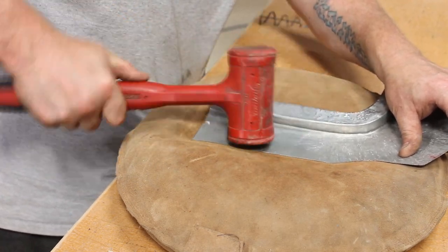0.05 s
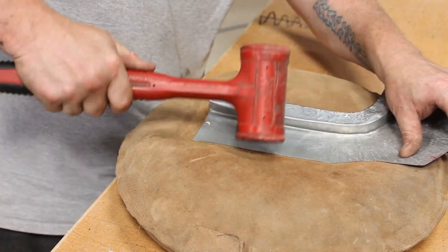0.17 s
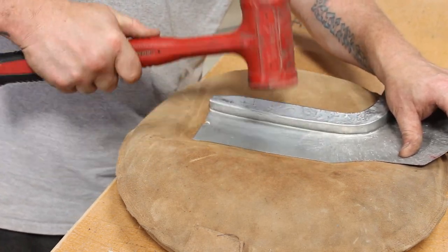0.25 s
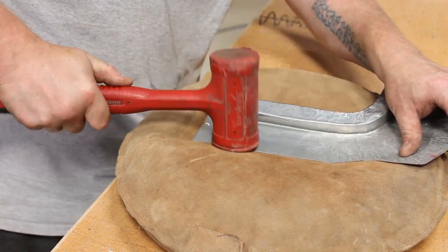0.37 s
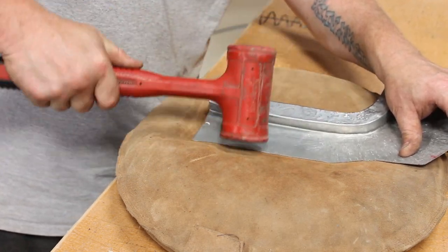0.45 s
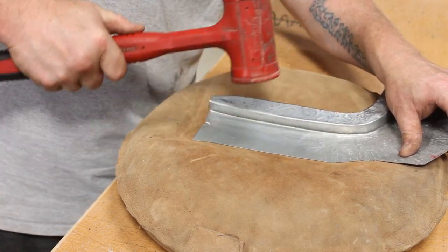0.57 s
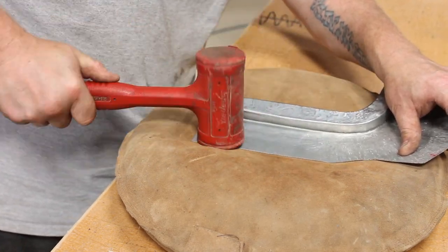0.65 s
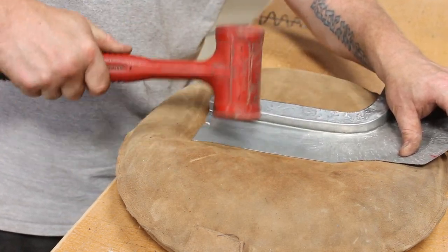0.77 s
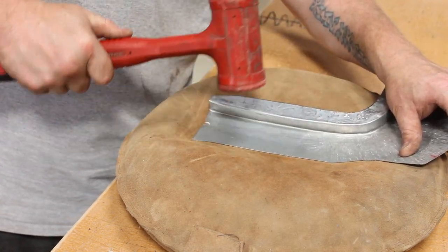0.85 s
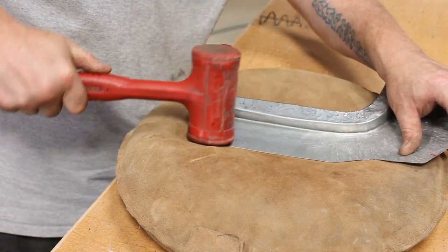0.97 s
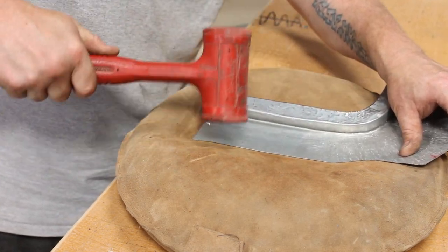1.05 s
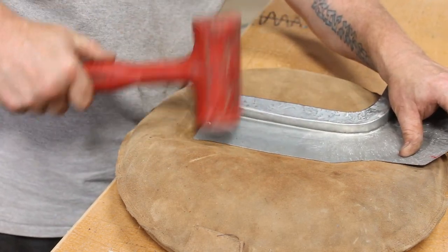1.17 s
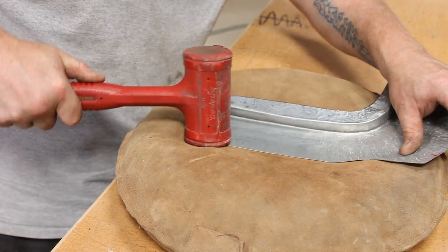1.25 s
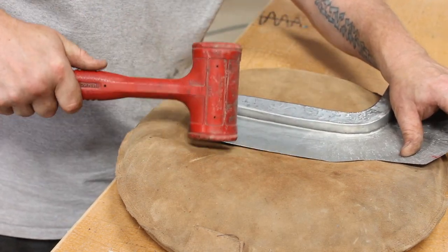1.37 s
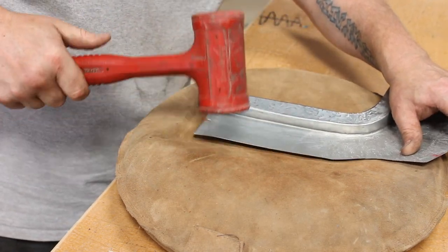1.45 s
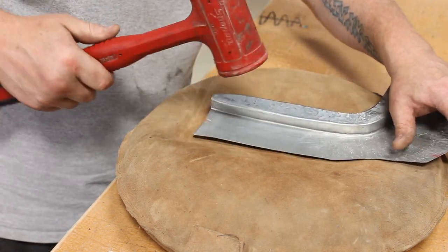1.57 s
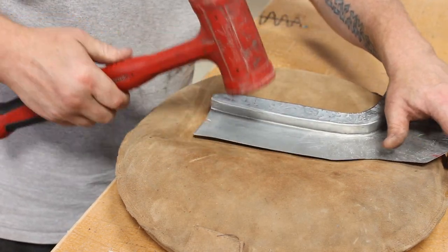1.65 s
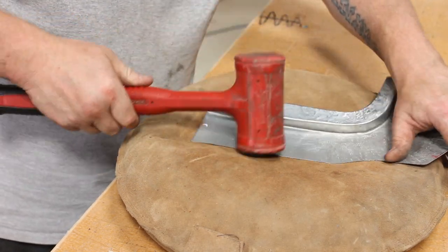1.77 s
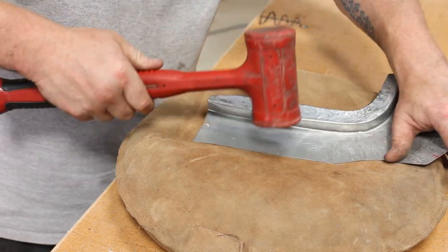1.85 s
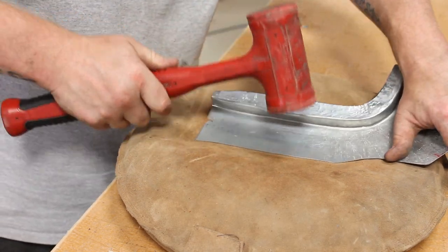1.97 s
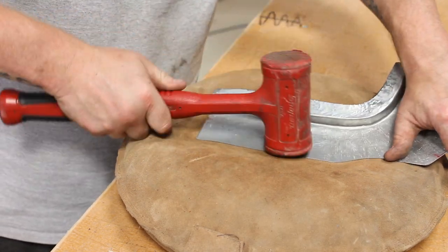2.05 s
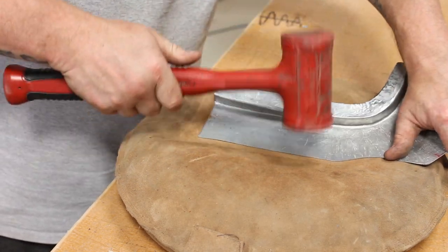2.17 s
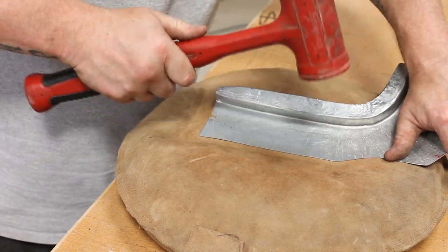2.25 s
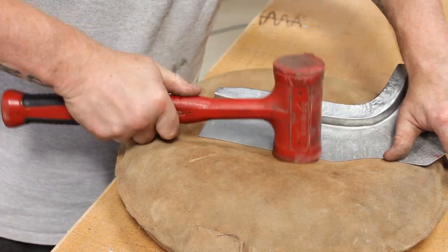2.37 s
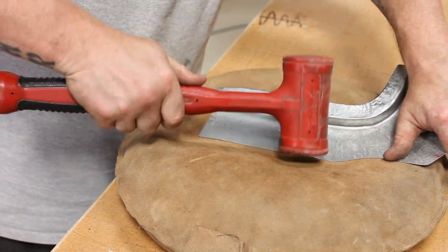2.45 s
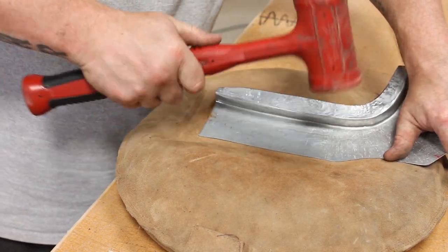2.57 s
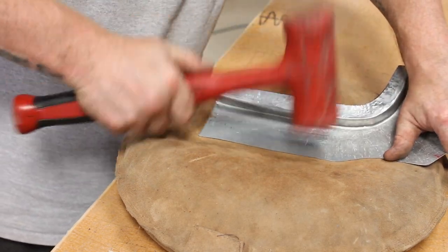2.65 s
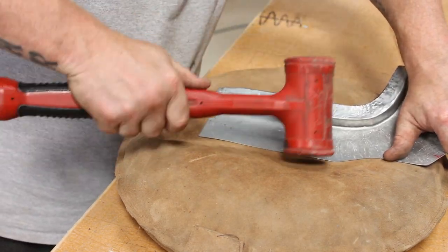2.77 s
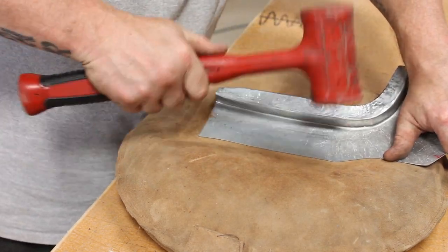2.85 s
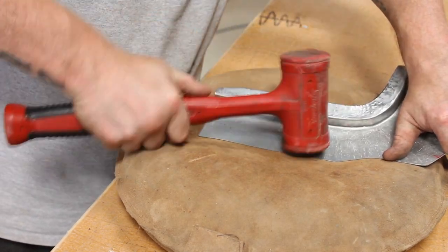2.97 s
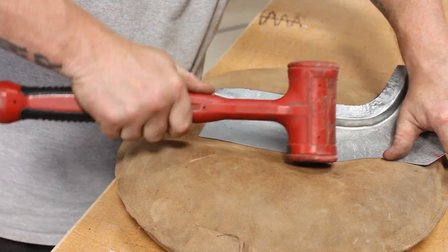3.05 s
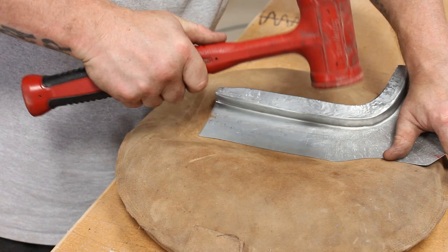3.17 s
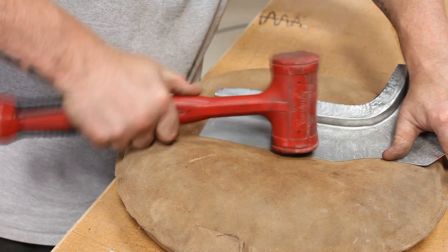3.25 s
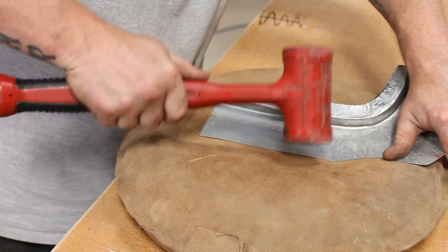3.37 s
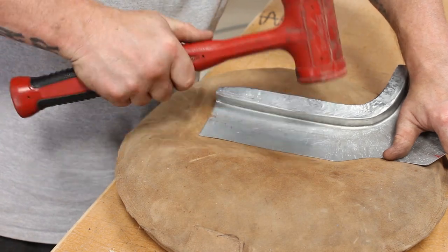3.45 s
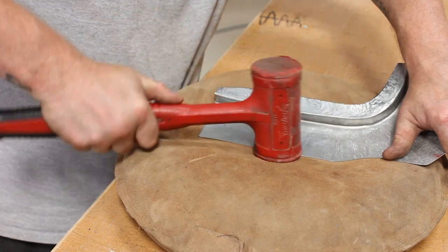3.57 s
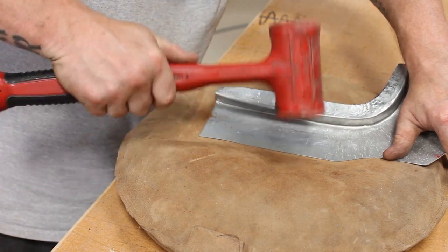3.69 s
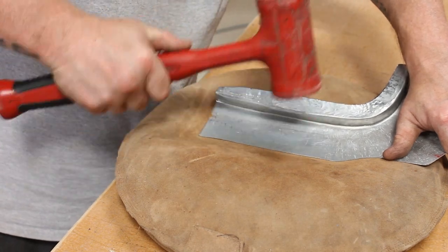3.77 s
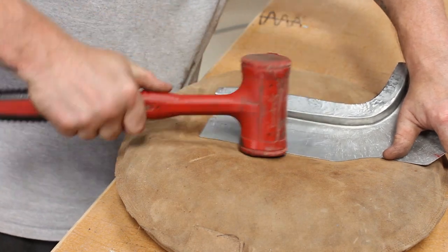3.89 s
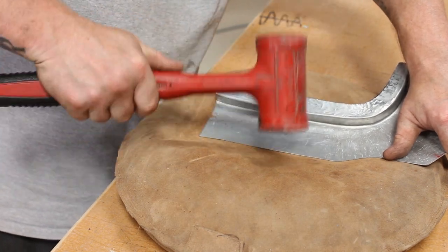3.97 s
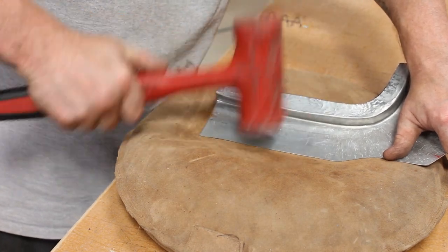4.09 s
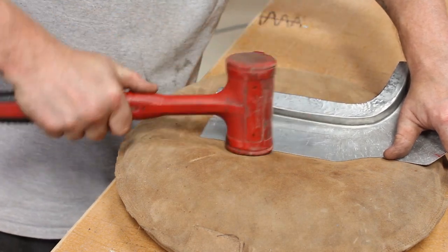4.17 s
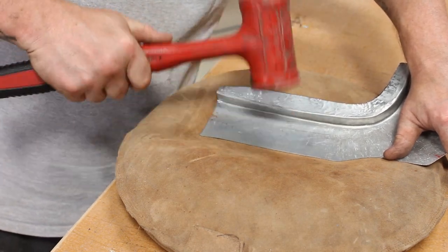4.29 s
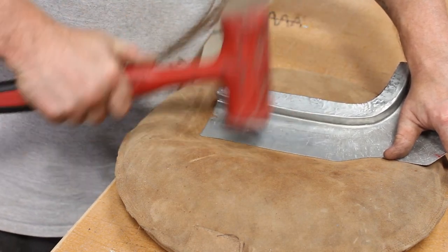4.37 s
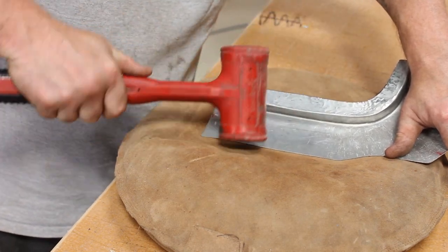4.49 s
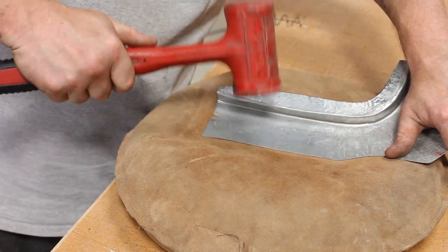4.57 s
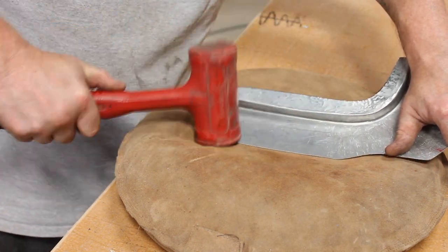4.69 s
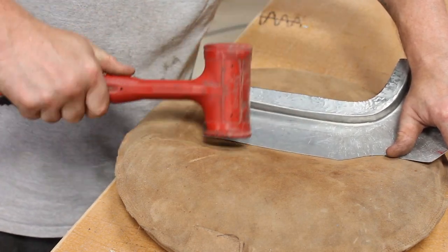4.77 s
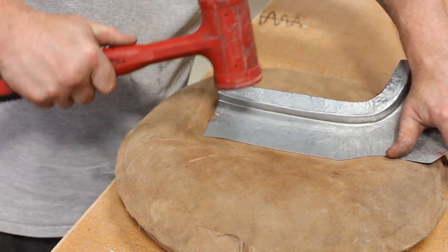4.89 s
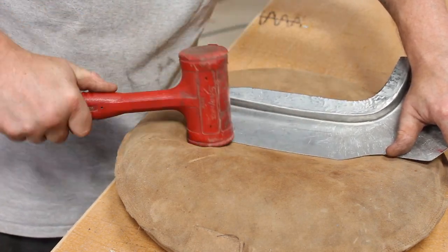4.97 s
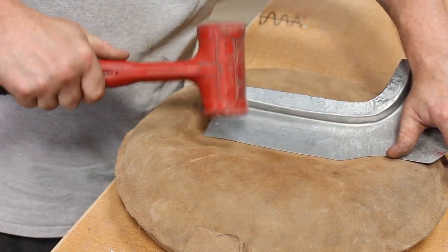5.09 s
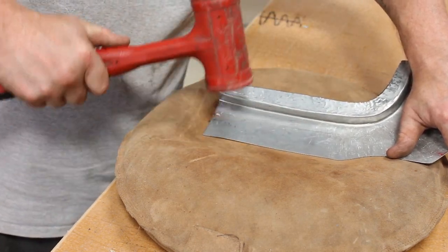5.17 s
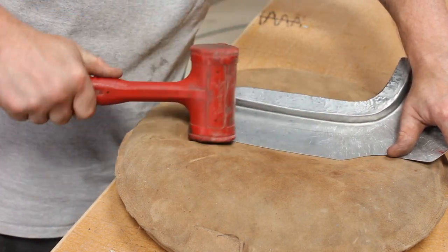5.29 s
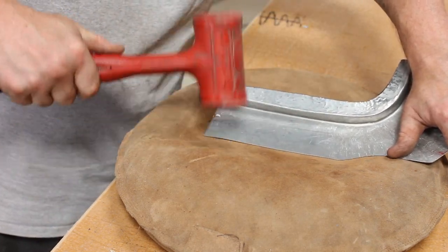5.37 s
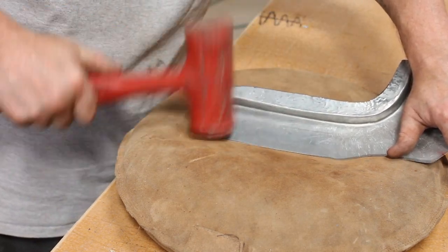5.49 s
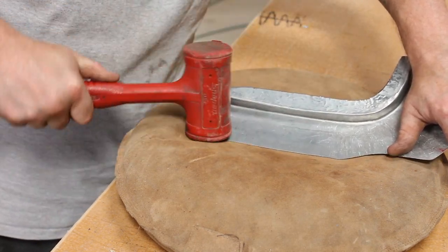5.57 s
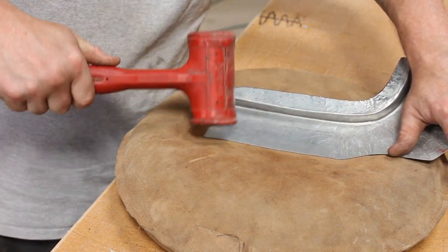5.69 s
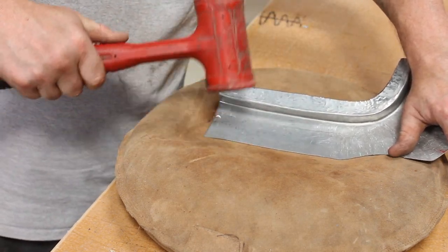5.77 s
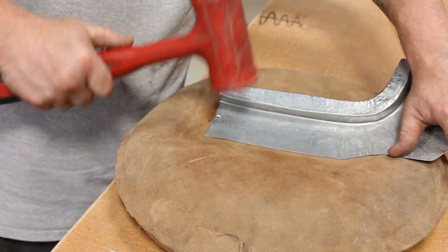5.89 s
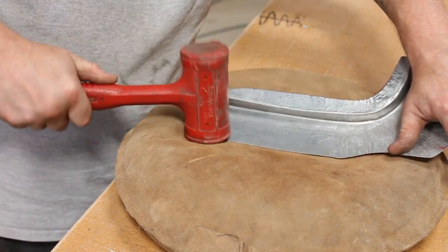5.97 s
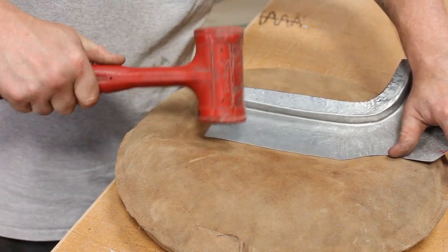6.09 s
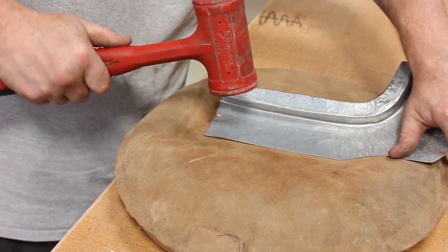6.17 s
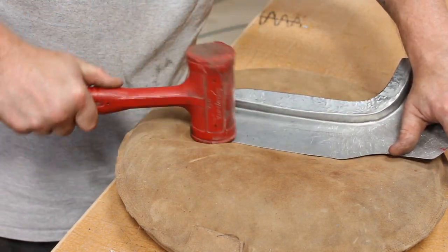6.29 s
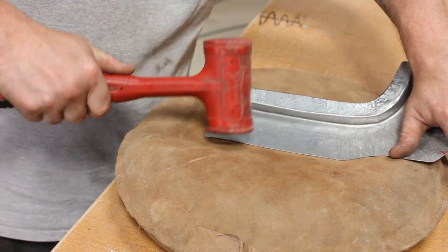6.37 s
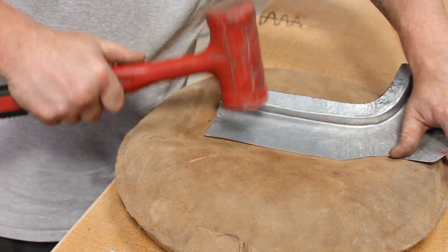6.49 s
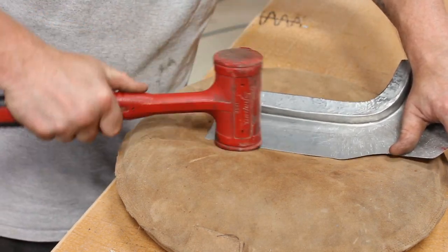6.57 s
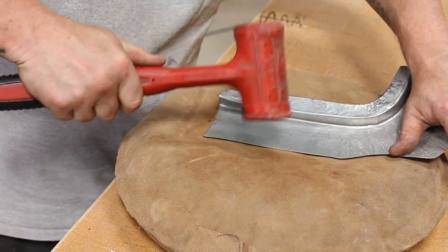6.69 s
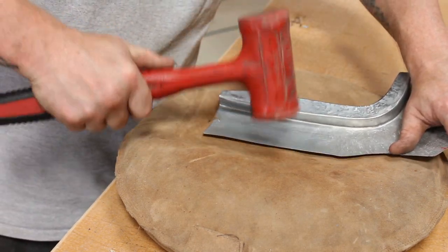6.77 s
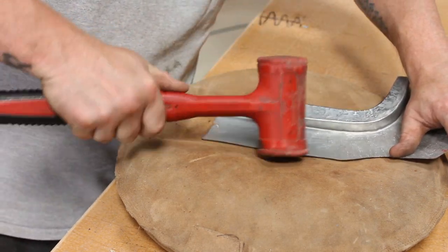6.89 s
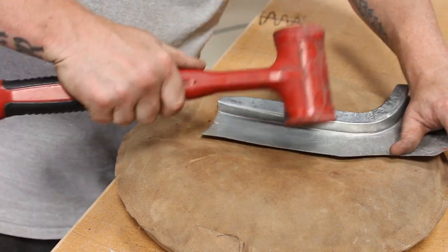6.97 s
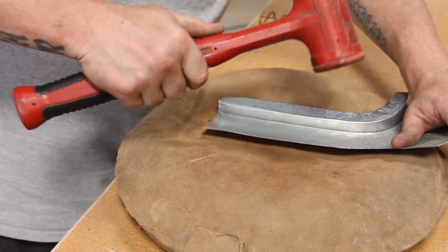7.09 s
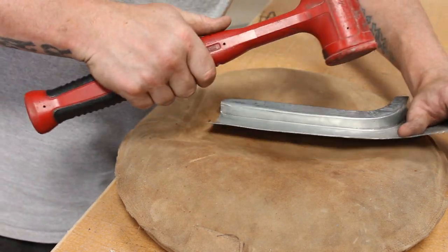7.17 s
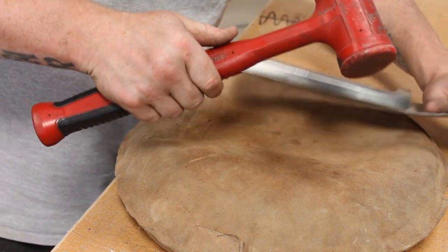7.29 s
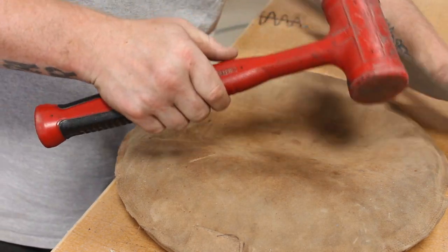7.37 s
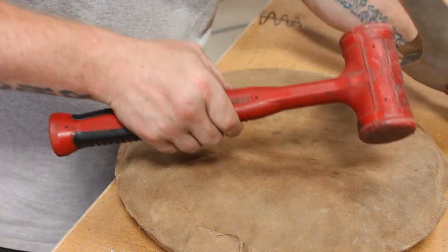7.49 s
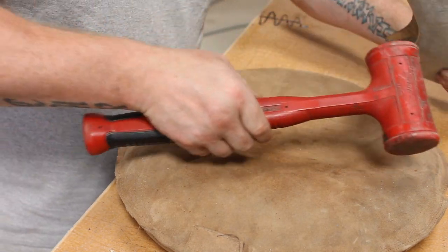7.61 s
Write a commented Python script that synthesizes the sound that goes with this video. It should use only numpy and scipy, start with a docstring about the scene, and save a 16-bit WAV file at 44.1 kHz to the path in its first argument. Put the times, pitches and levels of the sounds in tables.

```python
"""A dead-blow mallet beats a sheet-metal panel on a leather sandbag: shaped noise bursts excite a resonant spot.
Damped modes of the panel and bench, and a gliding sine for the bag, follow the force of each blow.
Decaying noise answers as the hall of a live workshop for about a second; the panel scuffs, ticks and sings faintly.
Air noise and a low hum lie beneath, and the near microphone overloads on the strongest peaks."""
import sys
import numpy as np
from scipy import signal
from scipy.fft import rfft, irfft
from scipy.io import wavfile
from scipy.ndimage import uniform_filter1d

SR = 44100
rng = np.random.default_rng(int(sys.argv[2]) if len(sys.argv) > 2 else 0)


def wrap_up_sound(samples):
    """Save the sound to the file named by the first command line argument, as 16-bit audio."""
    columns = np.atleast_2d(samples).T
    # keep every value between -1 and 1, then stretch to whole-number steps
    tamed = np.clip(columns, -1, 1)
    steps = np.round(tamed * 32767).astype(np.int16)
    wavfile.write(sys.argv[1], SR, steps)


N = 336923  # length [samples]
LEAD = SR // 2  # working time before zero [samples], so that an earlier blow can ring into the start
EDGE_HZ = 15900  # upper band limit of the microphone signal

# Force laws: value at a force of 0 dB, change per dB of force
CLANG_DB, CLANG_PER_DB = -4, 1.1146  # the middle of the crack grows fastest
SNAP_DB, SNAP_PER_DB = -1, 0.9467  # its treble grows a little slower than the force
RING_DB, RING_PER_DB = -7, 0.92  # the free modes of the panel
BAG_HZ, BAG_HZ_PER_DB = 107, 1  # pitch before its glide: packed harder, the sand is stiffer
# The slap fades with time constant SLAP_S [s] for a snap above PINNED_DB, and CHATTER_S [s] below LOOSE_DB
SLAP_S, CHATTER_S, PINNED_DB, LOOSE_DB = .0022, .0032, -9, -15

# Mallet blows: (time [s], force [dB], extra clang of a flat landing [dB], extra snap of an edge [dB],
# extra thump when the sand gives [dB], note of the struck spot [Hz], strength of that note [dB])
MALLET_BLOWS = [(-0.13, -2.5, 1.5, -2, -0.5, 780, -12), (0.1564, -3.5, 3, 2, -1, 1230, -6),
                (0.4469, -2.5, 2, -1.5, 1, 820, -3), (0.7328, -4.5, -1, 0, -1, 892, 4.5),
                (1.008, -8, -2, 0.5, 0, 757, 4.5), (1.2956, -6.5, -3, 0, 1, 2680, -3),
                (1.86, -18.5, 2, -1.5, 18.5, 2410, 8), (2.1364, -8.5, -3, -1, 0.5, 2240, 10),
                (2.4598, 3, -2, -1, 2, 1154, -0.5), (2.7804, .5, 0.5, 2.5, 4.5, 1300, -3.5),
                (3.073, -1, 2.5, -1, 4.5, 1300, -6), (3.3586, -2, 1.5, 1.5, 0.5, 1600, -4.5),
                (3.64, -1.5, 0.5, -.5, -2.5, 1370, -0.5), (3.9248, -4, 2, 2, -1, 1524, 0.5),
                (4.214, -4.5, 3, 2.5, 0.5, 1740, -5), (4.4956, -7.5, 4.5, 2.5, 4.5, 1710, -8),
                (4.7751, -7.5, -1, -1.5, 2, 1880, -6), (5.048, -8, -2.5, -2, 0.5, 3300, -2),
                (5.3212, -9, 0, -1, 1.5, 2040, -3), (5.6072, -5, -3, 0.5, -6, 820, -4.5),
                (6.0417, -6.5, -1.5, 1, -4, 2950, -10), (6.3469, -8.5, -1.5, -0.5, 4.5, 4370, -1),
                (6.6306, -6.5, -1, 1.5, 4, 890, 2), (6.911, -13, -1, 8, 9.5, 3600, 2)]


def mallet(alike=0.591, spot_db=3, spot_room_db=-4, panel_room_db=-27, radiating_hz=1500):
    """Impact excitation: one force drives the room, the direct cracks and the ringing bodies."""
    slaps, cracks, body = np.zeros((3, N + LEAD))
    usual = rng.standard_normal(1024)  # the part of the grain that all blows share
    # a narrow strip sends little bass into the room
    far_field = signal.butter(1, radiating_hz, "high", fs=SR)
    for s, force, flat, edge, give, spot_hz, spot in MALLET_BLOWS:
        own = rng.standard_normal(1024)
        grain = np.sqrt(alike) * usual + np.sqrt(1 - alike) * own
        hit = contact(grain, force, flat, edge)
        note = gain_of(spot) * spot_note(hit, spot_hz)
        panel = panel_ring(force)

        add(slaps, s, hit + gain_of(spot_room_db) * note)
        add(slaps, s, gain_of(panel_room_db) * signal.lfilter(*far_field, panel))
        add(cracks, s, hit + gain_of(spot_db) * note)
        for sound in (panel, bag_thump(force, give), bench_boom(force), standing_waves(force)):
            add(body, s, sound)
    return slaps, cracks, body


def contact(grain, force, flat, edge):
    """Contact spectrum: force and landing of the face set the bands of the slap separately."""
    clang = CLANG_DB + CLANG_PER_DB * force + flat
    snap = SNAP_DB + SNAP_PER_DB * force + edge
    # a feeble tap does not pin the sheet, which chatters a little longer
    fade_s = np.interp(snap, [LOOSE_DB, PINNED_DB], [CHATTER_S, SLAP_S])
    bands = [(280, force), (700, clang), (1400, clang), (4500, snap)]  # (frequency [Hz], level [dB])
    return signal.fftconvolve(slap(grain, fade_s), colour(bands))


def slap(grain, fade_s):
    """Broadband impulse: metal on leather gives a burst with a nearly even spectrum and unit energy."""
    fade = np.exp(-np.arange(len(grain)) / SR / fade_s)
    burst = grain * fade
    # in turn, even out the spectrum and restore the exponential fade
    for _ in range(3):
        spectrum = rfft(burst)
        burst = irfft(spectrum / (abs(spectrum) + 1e-9))
        power = abs(uniform_filter1d(burst ** 2, size=64))
        burst *= fade / np.sqrt(power + 1e-12)
    return burst / np.linalg.norm(burst)


def spot_note(hit, hz, q=8, overtone=1.88, overtone_db=-5):
    """Local resonance: the struck patch answers with a damped note and one overtone."""
    note = signal.lfilter(*signal.iirpeak(hz, q, fs=SR), hit)
    upper = signal.lfilter(*signal.iirpeak(hz * overtone, q, fs=SR), hit)
    return note + gain_of(overtone_db) * upper


# Colour of the crack: (frequency [Hz], relative level per Hz [dB])
CRACK_COLOUR = [(25, -6.5), (150, -2), (450, 2), (900, 3.5), (1600, 0), (2100, -7), (3000, -5), (4800, -21),
                (8000, -19.5), (15000, -35)]
# Reflections from floor and far wall: (delay [s], level [dB])
FIRST_ECHOES = [(.0048, -20), (0.018, -15.5), (0.0278, -16)]


def crack(cracks, crack_db=20.5, dull_hz=1700):
    """Early reflection: delayed, duller copies follow the direct crack."""
    near = gain_of(crack_db) * tinted(cracks, CRACK_COLOUR)
    dull = signal.lfilter(*signal.butter(2, dull_hz, fs=SR), near)
    heard = near.copy()
    for delay, db in FIRST_ECHOES:
        echo = np.pad(dull, (round(delay * SR), 0))[:len(near)]
        heard += gain_of(db) * echo
    return heard


# Panel modes, damped by hand and bag: (frequency [Hz], level [dB], t60 [s])
PANEL_MODES = [(318, -13.5, 0.078), (473, -7.5, 0.023), (1000, -11, 0.041), (1414, -12.5, 0.038),
               (1770, -17, 0.011), (2022, -21, 0.058), (2377, -18, 0.056), (2756, -13.5, 0.024),
               (2930, -13.5, 0.039), (3600, -28.5, 0.03), (4150, -14.5, 0.02), (6050, -48.5, 0.014),
               (6400, -39, 0.016), (6930, -60, 0.014)]


def panel_ring(force):
    """Modal vibration: the damped sheet rings in its free modes."""
    return gain_of(RING_DB + RING_PER_DB * force) * ring(PANEL_MODES, rise=.0008, detune=.03, scatter=2)


def bag_thump(force, give, bag_db=-19, t60=0.18, rise=0.0098, sag=0.092, sag_per_db=-0.06, sag_s=0.017,
              rock_hz=60, rock_db=-19, rock_t60=0.64):
    """Nonlinear spring: the bag's pitch glides as it dies, while the bench rocks under it."""
    t = np.arange(SR) / SR
    hz = BAG_HZ + BAG_HZ_PER_DB * force
    # the pitch sinks where the sand gives little, and climbs once give passes about 1.5 dB
    glide = 1 + (sag + sag_per_db * give) * (np.exp(-t / sag_s) - .25)
    turns = np.cumsum(hz * glide) / SR
    sand = gain_of(-60 * t / t60) * np.sin(2 * np.pi * turns)
    rocking = gain_of(rock_db - 60 * t / rock_t60) * np.sin(2 * np.pi * rock_hz * t)
    swell = 1 - np.exp(-(t / rise) ** 2)
    return gain_of(force + give + bag_db) * (sand + rocking) * swell


# Modes of the bench under the bag: (frequency [Hz], level relative to the force [dB], t60 [s])
BENCH_MODES = [(186, -14, 0.21), (233.6, -8.5, 0.057), (259.1, -9, 0.15), (331, -23, 0.37),
               (405.3, -22.5, 0.2), (499.4, -16, 0.13), (679, -19.5, 0.16), (748, -25, 0.15),
               (963, -27, 0.22), (1631, -18, 0.12)]


def bench_boom(force):
    """Structure-borne vibration: the blow sets off the modes of the bench."""
    return gain_of(force) * ring(BENCH_MODES, rise=.007, detune=.006, scatter=1.2)


# Standing waves of the workshop: (frequency [Hz], level relative to the force [dB], t60 [s])
ROOM_MODES = [(55, -47, 0.83), (185, -34, 1), (204, -36.5, 0.9), (256, -25, 1), (267, -34, 0.78)]


def standing_waves(force):
    """Room modes: low standing waves build slowly and die slowly."""
    return gain_of(force) * ring(ROOM_MODES, rise=.04, detune=.002, scatter=1.2)


def shifting_paths(slaps, count=4, cycle_s=2.5):
    """Varying transfer path: as worker and panel move, the blows cross-fade between hall answers."""
    turn = np.arange(len(slaps)) / SR / cycle_s
    shares = np.array([np.maximum(np.cos(2 * np.pi * (turn - k / count)), 0) for k in range(count)])
    shares /= np.linalg.norm(shares, axis=0)  # constant total power
    return sum(workshop(slaps * share) for share in shares)


# Colour of the hall: (frequency [Hz], relative level per Hz [dB])
HALL_COLOUR = [(30, -16.5), (90, -5.5), (200, 0.5), (265, -3), (335, -5), (470, 1.5), (600, -1.5),
               (760, -6), (1650, -8.5), (1950, -16.5), (3700, -26), (5000, -34), (8500, -39.5),
               (16000, -58.5)]
# Reverberation time of the hall: (frequency [Hz], t60 [s])
HALL_DECAY = [(60, 0.54), (250, 0.94), (550, 1.254), (1500, 0.94), (4000, 1.164), (8000, 0.84),
              (15000, 0.55)]


def workshop(slaps, late_db=-19.5, early_db=-15, early_t60=0.11, build_s=0.0025, treble_db=2,
             walls_db=-25, walls_s=0.026, walls_treble_db=10):
    """Diffuse reverberation: a bench flurry, a bright answer off the walls, then the hall's tail."""
    t = np.arange(2 * SR) / SR
    late, early, walls = rng.standard_normal((3, len(t)))

    # the tail decays at its own rate in each band
    hz, when, bands = signal.stft(tinted(late, HALL_COLOUR), SR, nperseg=512)
    decay = gain_of(-60 * when / read(HALL_DECAY, hz)[:, None])
    late = signal.istft(bands * decay, SR, nperseg=512)[1][:len(t)]

    # short paths keep more of their treble
    early_tint = colour([(250, -5.5), (500, -2), (1000, -12.0), (8000, treble_db)])
    early = signal.fftconvolve(tinted(early, HALL_COLOUR), early_tint)[:len(t)]
    walls_tint = colour([(500, -3.5), (2000, 4.0), (8000, walls_treble_db)])
    walls = signal.fftconvolve(tinted(walls, HALL_COLOUR), walls_tint)[:len(t)]
    swell = (t / walls_s * np.exp(1 - t / walls_s)) ** 4  # peaks at walls_s

    answer = gain_of(late_db) * late
    answer += gain_of(early_db - 60 * t / early_t60) * early
    answer += gain_of(walls_db) * swell * walls
    build = 1 - np.exp(-(t / build_s) ** 2)
    return signal.oaconvolve(slaps, answer * build)[:len(slaps)]


# Panel sliding over the leather: (time [s], level [dB])
SLIDE_LEVEL = [(1.68, -99), (1.73, -60), (1.85, -58.5), (2.1, -52.5), (2.3, -64), (2.45, -70), (2.8, -60.5),
               (3.0, -101)]


def sliding():
    """Friction noise: irregular grains follow the slide of the panel over the leather."""
    t = (np.arange(N + LEAD) - LEAD) / SR
    knots = t[::200]
    flicker_db = 1.3 * np.interp(t, knots, rng.standard_normal(len(knots)))
    grains = rng.standard_normal(len(t)) * gain_of(flicker_db)
    return grains * gain_of(np.interp(t, *np.transpose(SLIDE_LEVEL)))


# Ticks as the panel is lifted away: (time [s], level [dB])
LIFT_TICKS = [(7.282, -66.5), (7.497, -60.5), (7.514, -66.5)]


def lift_ticks(t60=0.079):
    """Transient noise: each tick is an exponentially decaying burst."""
    ticks = np.zeros(N + LEAD)
    age = np.arange(SR // 8) / SR
    for s, db in LIFT_TICKS:
        add(ticks, s, gain_of(db - 60 * age / t60) * rng.standard_normal(len(age)))
    return ticks


# Colour of scuffs and ticks: (frequency [Hz], relative level per Hz [dB])
SCUFF_COLOUR = [(500, -23.5), (1500, 11.5), (2600, 8.5), (4000, 1.5), (5000, -3), (6200, -0.5), (8000, -6),
                (10000, -7.5), (15000, -13.5)]


def handling():
    """Source-filter principle: one spectrum colours the scuffs of turning and the ticks of lifting."""
    return tinted(sliding() + lift_ticks(), SCUFF_COLOUR)


# Note of the panel once it hangs free: (frequency [Hz], level [dB], t60 [s])
FREE_MODE = [(620, -61.5, 4.2)]


def lifted_panel(s=7.22):
    """Light damping: off the bag, the panel sings faintly in one slowly decaying mode."""
    note = np.zeros(N + LEAD)
    add(note, s, ring(FREE_MODE, rise=0.017))
    return note


# Colour of the air noise: (frequency [Hz], relative level per Hz [dB])
AIR_COLOUR = [(20, -25), (36, -15.5), (56, 1), (90, -5), (250, -12.5), (600, -6), (1500, -16),
              (4000, -35.5), (10000, -34.5), (16000, -43.5)]


def room_tone(air_db=-62, hum_db=-60, hum_hz=48.4):
    """Stationary background: faint coloured noise and the low sine hum of a distant motor."""
    t = np.arange(N + LEAD) / SR
    air = tinted(rng.standard_normal(len(t)), AIR_COLOUR)
    hum = np.sqrt(2) * np.sin(2 * np.pi * hum_hz * t)  # unit rms
    return gain_of(air_db) * air + gain_of(hum_db) * hum


def ring(modes, rise, detune=0, scatter=0):
    """Modal superposition: decaying sines swell over the rise time [s]; each strike varies them."""
    t = np.arange(SR * 3 // 2) / SR
    hz, db, t60 = np.array(modes, float).T[:, :, None]
    pitch, strength = rng.standard_normal((2, len(modes), 1))
    level = gain_of(db + scatter * strength - 60 * t / t60)
    waves = level * np.sin(2 * np.pi * hz * (1 + detune * pitch) * t)
    signs = (-1) ** np.arange(len(modes))  # neighbouring modes start in opposite phase
    return signs @ waves * (1 - np.exp(-(t / rise) ** 2))


def colour(points):
    """Minimum phase: the log spectrum alone fixes a causal filter, through the Hilbert transform."""
    hz = abs(np.fft.fftfreq(4096, 1 / SR))
    log_gain = np.log(gain_of(read(points, hz)))
    return np.fft.ifft(np.exp(np.conj(signal.hilbert(log_gain)))).real[:2048]


def tinted(x, points):
    """Power-preserving filter: colours a sound and keeps the power that white noise would have."""
    taps = colour(points)
    return signal.oaconvolve(x, taps / np.linalg.norm(taps))[:len(x)]


def read(points, hz):
    """Logarithmic frequency scale: joins the points of a table by straight lines."""
    f, value = np.transpose(points)
    return np.interp(np.log(hz + 1), np.log(f + 1), value)


def gain_of(db):
    """Level law: decibels to amplitude."""
    return 10 ** (np.asarray(db) / 20)


def add(mix, s, sound):
    """Linear superposition: mixes a sound in at time s [s]; the mix opens LEAD samples before zero."""
    part = mix[round(s * SR) + LEAD:][:len(sound)]
    part += sound[:len(part)]


def scene():
    """Superposition at one microphone, heard on both channels."""
    slaps, cracks, body = mallet()
    blows = crack(cracks) + body + shifting_paths(slaps)
    mono = (blows + handling() + lifted_panel() + room_tone())[LEAD:]
    return np.array([mono, mono])


def record(dry):
    """Overload and band limiting: the input clips hard, then a low-pass removes the top treble."""
    ceiling = .32  # of full scale
    clipped = np.clip(dry, -ceiling, ceiling)
    low_pass = signal.firwin(101, EDGE_HZ, window=("kaiser", 8), fs=SR)
    return signal.oaconvolve(clipped, low_pass[None], "same")


dry = scene()
out = record(dry)
wrap_up_sound(out)
```